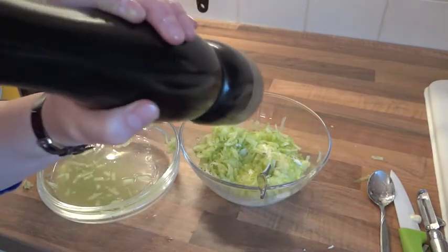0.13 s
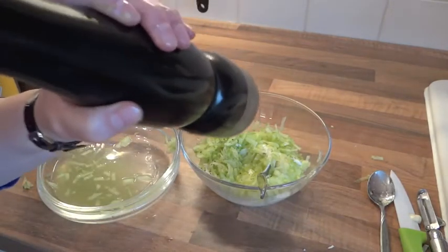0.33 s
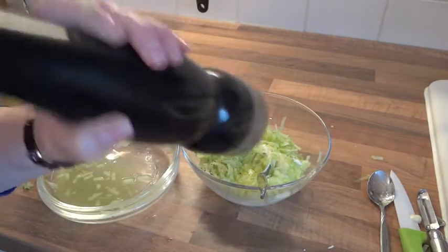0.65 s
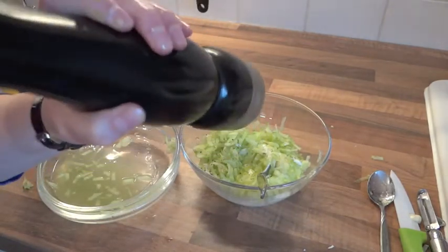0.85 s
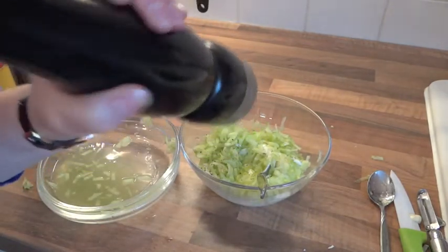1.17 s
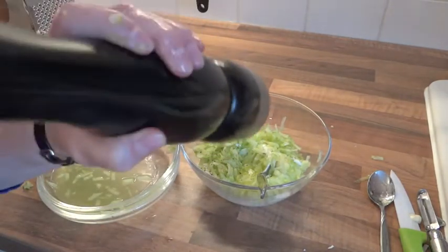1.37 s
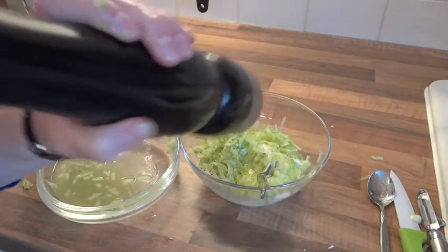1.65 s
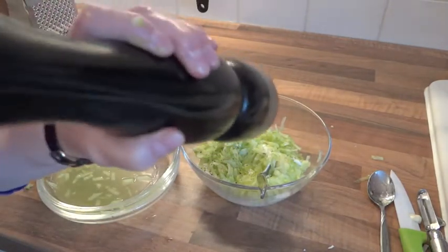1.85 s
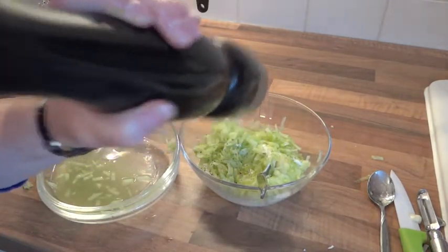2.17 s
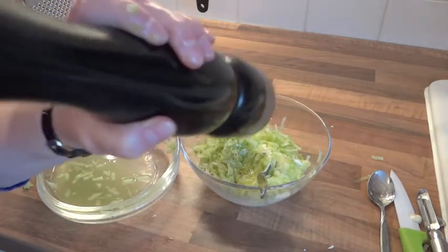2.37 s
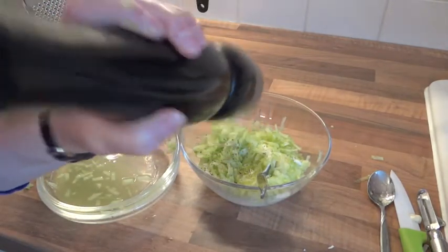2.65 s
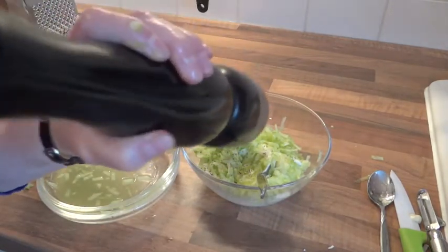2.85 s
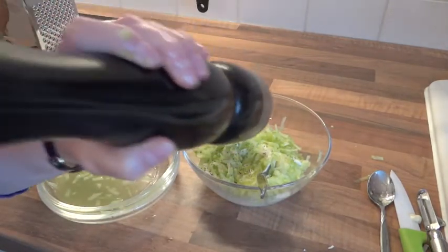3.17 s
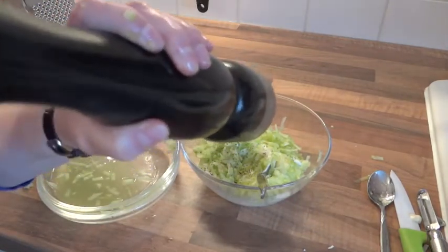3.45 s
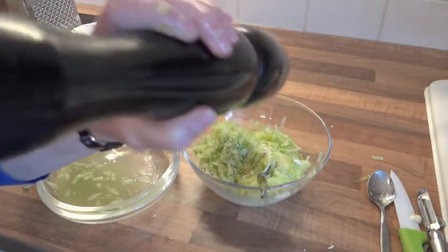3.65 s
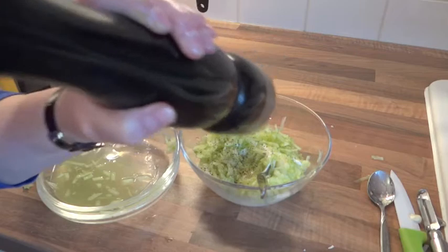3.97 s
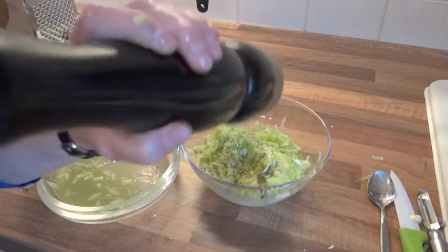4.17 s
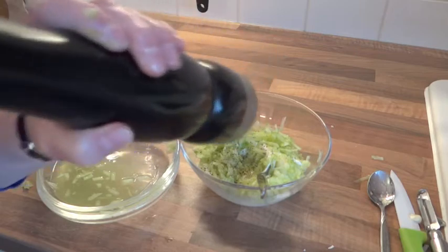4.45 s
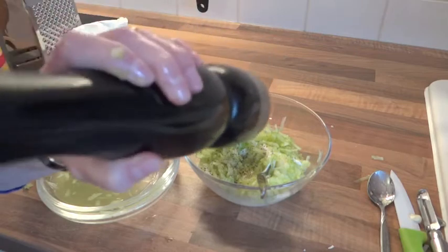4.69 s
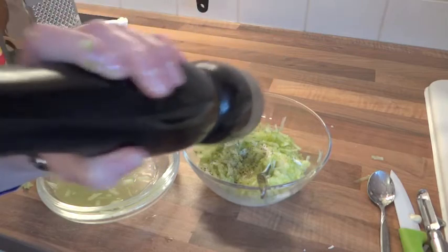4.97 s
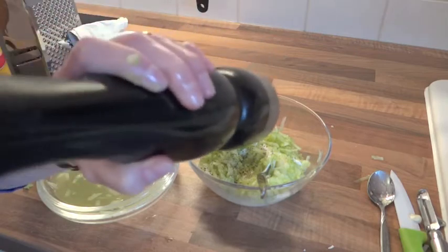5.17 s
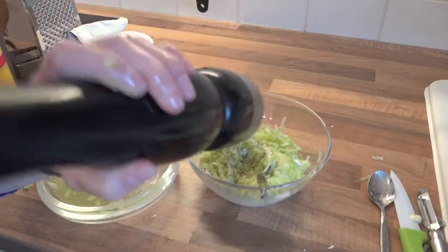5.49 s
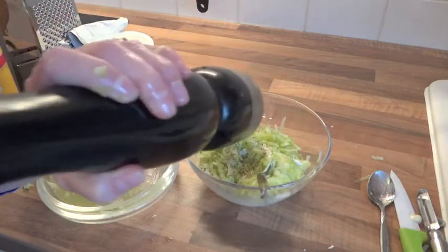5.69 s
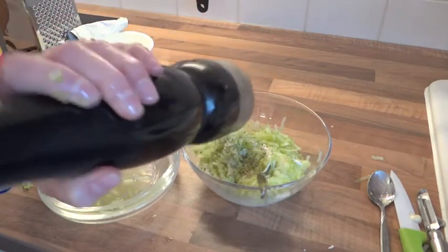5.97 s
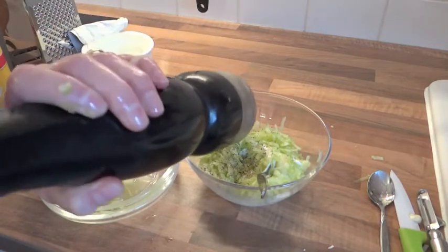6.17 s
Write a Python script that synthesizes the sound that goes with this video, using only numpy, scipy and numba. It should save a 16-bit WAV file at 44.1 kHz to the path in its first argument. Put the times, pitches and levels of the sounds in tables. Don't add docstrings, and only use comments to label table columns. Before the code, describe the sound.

Pepper grinding in a kitchen: short, rough crunches of about a tenth to a fifth of a second, slightly uneven in strength and tone, with small creaking lead-ins as the burr takes up slack. Lone corns pop during and after strokes, fingers tick lightly on the mill, and a loose metal shaft knocks late on. Close phone sound, hard reflective room, quiet household hum.

```python
import sys
import numpy as np
from scipy import signal
from scipy.fft import rfft, irfft
from scipy.io import wavfile
from scipy.ndimage import uniform_filter1d
from numba import njit

SR = 44100
rng = np.random.default_rng(int(sys.argv[2]) if len(sys.argv) > 2 else 0)


def magnitude_from_level(level_db):
    exponent = np.asarray(level_db, float) / 20
    return 10 ** exponent


def wrap_up_sound(samples):
    columns = np.atleast_2d(samples).T
    tamed = np.clip(columns, -1, 1)
    steps = np.round(tamed * 32767).astype(np.int16)
    wavfile.write(sys.argv[1], SR, steps)


N = 279153

# pitch_hz, level_db (per Hz)
HUM = [(15, -53.5), (25, -15), (60, -5.5), (220, -3), (296, 6.5), (456, -12.5), (668, -11.5), (1430, -20.5),
       (2200, -23), (3500, -25), (6000, -28), (7500, -27.5), (11000, -31), (14300, -76), (22000, -120)]
# pitch_hz, side_minus_mid_db
HUM_SIDE = [(60, -15.5), (200, -13), (600, 1.5), (2000, 5), (6000, -4), (10000, -7)]
HUM_DB, WHINE_HZ, WHINE_DB = -57, 7420, -80

# start_s, rise_s, hold_s, fall_s, peak_db
STROKES = [(0.0, .003, 0.0089, 0.045, -13), (0.387, 0.027, 0.0055, 0.013, -21),
           (0.434, 0.011, 0.014, .07, -31), (1.062, 0.03, 0.034, 0.097, -21),
           (1.621, 0.012, 0.039, 0.096, -17), (2.082, 0.056, 0.0071, 0.081, -15),
           (2.546, 0.025, 0.067, 0.049, -16), (3.001, 0.046, 0.058, 0.048, -16.5),
           (3.481, 0.07, 0.013, 0.069, -15.5), (3.97, 0.059, 0.05, 0.072, -14),
           (4.454, 0.042, 0.021, 0.097, -13), (4.919, 0.023, 0.05, .065, -18),
           (5.39, 0.06, 0.027, 0.09, -16), (5.921, .045, 0.033, .06, -19.5)]
# bite_below_peak_db, stop_below_peak_db, thump_db, brightness_db, extra_grit_db
CRUSHES = [(3, 18.5, -7, 0.5, 1.5), (22, 20, -7.5, 0, 1.5), (3, 8.5, -8, 7.5, 9.5), (6, 17.5, -6.5, 0.5, 5),
           (6, 14.5, -11, -1, 2), (19, 20, -9, -2, 1), (4.07, 13.5, -18, 1.5, -2),
           (17, 13.5, -8.5, 1.5, 0.5), (17, 21, -8.5, -2.5, 2), (19.5, 12, -15.5, -2, -1.5),
           (6, 20.5, -16, -1.5, 0.5), (6, 12.5, -14.5, 5.5, -2), (10.1, 17, -14.5, 2, 0.5),
           (4, 8.5, -9, 4.5, -1)]
# body_hz, burr_hz
GRIPS = [(1420, 2800), (1360, 4200), (1326, 2800), (1313, 3540), (1346, 3620), (1413, 3350), (1630, 3470),
         (1464, 3550), (1293, 4100), (1510, 3560), (1296, 3670), (1387, 3900), (1464, 3000), (1346, 3700)]
# start_s, length_s, creep_db, bite_db
SLACKS = [(0.347, .039, -37.5, -27), (1.002, 0.049, -51, -42), (1.569, 0.069, -43, -29),
          (2.069, 0.026, -34.5, -30), (2.48, 0.069, -47, -24), (2.942, 0.055, -46, -39),
          (3.418, 0.07, -54, -37), (3.927, 0.05, -39.5, -29.5), (4.417, 0.035, -38, -23),
          (4.882, 0.038, -36.5, -24.5), (5.355, 0.03, -38, -35), (5.862, 0.052, -47.5, -15)]
# start_s, peak_db, brightness_db, pitch_hz, thump_db
SNAPS = [(.1682, -7, -0.5, 3390, -38), (.5806, -15.5, 0.5, 3510, -1.5), (.6322, -15, 2, 3470, -11),
         (.7138, -21.5, -22, 3350, -22), (1.1859, -15, 6, 5100, 5.5), (1.8537, -16.5, -2.5, 3390, -13.5),
         (2.3124, -25, 5.5, 2720, -4), (2.7866, -23.5, 6.5, 3780, 0), (3.2397, -15.5, 0, 3410, -10),
         (3.724, -16, -5.5, 2540, -12.5), (4.6784, -23, 5.5, 4280, -31), (4.779, -20.5, 7, 4050, -6.5),
         (5.6256, -14, 7, 3780, -13), (5.634, -16.5, 0, 2920, -14)]
# start_s, peak_db, brightness_db, pitch_hz
BITES = [(0.4312, -22, 17, 5630), (1.064, -6.5, 2, 4780), (1.6703, -9.5, -1, 2880), (2.5493, -13, -2, 3660),
         (3.0335, -6, -3, 5100), (3.4984, -18, 3, 3530), (3.5384, -5, 2.5, 3395), (4.597, -18, -8, 3560),
         (.407, -10, -5, 3410), (2.141, -13, -2, 3370), (4.4536, -2, -2.5, 3650), (4.9263, -10.5, 3, 4900),
         (5.4008, -2.5, -49, 3610), (5.9004, -17, 7.5, 4370), (5.926, -10, -1, 4530)]
# start_s, peak_db, brightness_db, pitch_hz
TICKS = [(0.344, -28, 1.5, 3280), (.56, -25, -4, 2070), (1.002, -33.5, 7, 2460), (1.526, -63, 12, 3710),
         (2.06, -24.5, -0.5, 2430), (2.475, -32, 1, 2980), (2.9479, -30, 4, 5000), (3.421, -31, -3.5, 3300),
         (3.4507, -26.5, -4, 2920), (3.937, -30.5, -2, 3460), (4.35, -50, 9, 5300),
         (4.4133, -30, -1.5, 3260), (5.3587, -36, -12, 3380), (5.794, -26, 0.5, 2620),
         (5.8686, -23, -4, 2560)]
EDGES_HZ = (1000, 2300, 6000)
# pitch_hz, level_db (per Hz)
CRACK = [(40, -45), (100, -37.5), (200, -18), (400, -16), (700, -8.5), (1100, -17.5), (1400, 1.5),
         (2500, -12), (3500, -4), (5000, -14), (7700, -12), (11000, -28), (14000, -88.5), (22000, -100)]
# pitch_hz, width_hz, level_db
RINGS = [(1364, 155, -1.5), (1970, 196, -7), (2540, 43, -6.5), (2907, 97, -14), (3390, 100, -4.5),
         (4392, 55, -7.5), (4690, 65, -8), (4850, 140, -3.5), (5536, 84, -4), (6110, 55, -8.5),
         (7100, 90, -31), (7800, 150, -21), (8895, 92, -8.5), (9840, 170, -17.5)]
BURR_DB, GRIT_DB, GRIT_PER_BURR = -2, -5.5, 1.36
DULLING_DB, FALL_BEND, SLACK_BEND = -1.5, 0.6, 2.7
SLACK_BRIGHT_DB, SLACK_THUMP_DB = -1.5, -4.5
SNAP_BURR_DB, SNAP_GRIT_DB, BITE_THUMP_DB, TICK_THUMP_DB = -2, -10, -33, -18.5
SNAP_MS, BITE_MS, TICK_MS = (1.96, 4.46), (0.93, 3.7), (0.6, 3.96)  # rise_ms, fade_ms

# pitch_hz, t60_s
WALLS = [(150, 0.53), (500, 0.37), (1400, 0.44), (3700, 0.42), (9700, 0.34)]
# pitch_hz, side_minus_mid_db
WALLS_SIDE = [(150, -12.5), (600, -10), (2000, -10.5), (6000, -9), (10000, -7.5)]
# pitch_hz, level_db, t60_s
SHAFT = [(3470, -9, 0.3), (3910, -13, 0.2), (4105, -7, 0.16), (4720, -10, 0.2), (5440, -13, 0.22),
         (7000, -15, 0.2), (7590, -18, 0.25)]
# start_s, level_db
SHAFT_KNOCKS = [
    (4.682, -46),
    (4.779, -27),
]
TOP_HZ = 10970


def on_log_hz(table, hz):
    points, values = np.transpose(table)
    return np.interp(np.log(hz + 1), np.log(points), values)


def unit(x):
    return x / np.sqrt(np.mean(x ** 2))


def walk(rate):
    k = int(SR / rate)
    held = np.repeat(rng.standard_normal(N // k + 1), k)
    return unit(uniform_filter1d(held, k)[:N])


@njit
def ring(x, hz, width):
    y, z, p, r = np.empty(len(x)), 0j, 0j, np.exp(-np.pi * width / SR)
    for i in range(len(x)):
        if i % 32 == 0:
            p = r * np.exp(2j * np.pi * hz[i] / SR)
        z = z * p + x[i] + 1e-18
        y[i] = z.imag
    return y * np.sqrt(2 * (1 - r * r))


def hum():
    hz = np.fft.rfftfreq(N, 1 / SR)
    noise = rfft(rng.standard_normal((2, N))) * magnitude_from_level(on_log_hz(HUM, hz))
    noise[1] *= magnitude_from_level(on_log_hz(HUM_SIDE, hz))
    mid, side = irfft(noise, N)
    swell = magnitude_from_level(HUM_DB + 2.0 * walk(6.6))
    return swell * np.array([mid + side, mid - side]) / np.std(mid)


def whine():
    line = ring(rng.standard_normal(N), np.full(N, 1. * WHINE_HZ), 30.)
    return magnitude_from_level(WHINE_DB + 3.0 * walk(3)) * line


def swarm(per_s, spread_db):
    when, sign, size = rng.random((3, N))
    sizes = magnitude_from_level(-spread_db * np.log(size + 0.027))
    return unit((when < per_s / SR) * np.sign(sign - .5) * sizes)


def efforts():
    for (s, *lengths, peak), (bite, stop, thump, bright, grit) in zip(STROKES, CRUSHES):
        up, hold, down = (np.linspace(0, 1, max(int(d * SR), 1)) for d in lengths)
        db = peak - np.r_[bite * (1 - up), 0 * hold, stop * down ** FALL_BEND]
        yield s, db, bright, grit + DULLING_DB * np.r_[0 * up, 0 * hold, down], thump
    for s, length, creep, bite in SLACKS:
        db = creep + (bite - creep) * np.linspace(0, 1, int(length * SR)) ** SLACK_BEND
        yield s, db, SLACK_BRIGHT_DB, 0, SLACK_THUMP_DB


def crushing(cracks, direct_db):
    drive = np.zeros((4, N))
    for s, db, bright, extra_grit, thump in efforts():
        span = slice(int(s * SR), int(s * SR) + len(db))
        onset = np.minimum(np.arange(len(db)) / SR / 0.0013, 1)
        grit = GRIT_DB + GRIT_PER_BURR * bright + extra_grit
        for k, rel in enumerate((thump, 0, BURR_DB + bright, grit)):
            drive[k, span] += magnitude_from_level(db + rel + direct_db) * onset * cracks[span]
    return drive


def lone_corns(snap_db):
    snaps, notes = np.zeros((4, N)), np.zeros(N)
    t = np.arange(2000) / SR
    corns = [(*row, SNAP_MS) for row in SNAPS]
    corns += [(*row, BITE_THUMP_DB, BITE_MS) for row in BITES]
    corns += [(*row, TICK_THUMP_DB, TICK_MS) for row in TICKS]
    for s, body, bright, hz, thump, (rise_ms, fade_ms) in corns:
        splinter = np.sign(rng.standard_normal(2000))
        rise = 1 - np.exp(-t * 1000 / rise_ms)
        fade = np.exp(-t * 1000 / fade_ms)
        span = slice(int(s * SR), int(s * SR) + 2000)
        burr = SNAP_BURR_DB + bright
        grit = SNAP_GRIT_DB + GRIT_PER_BURR * bright
        levels = magnitude_from_level(body + snap_db + np.array([[thump], [0], [burr], [grit]]))
        snaps[:, span] += levels * splinter * rise * fade
        notes[span] += magnitude_from_level(body + burr + snap_db + 4.5) * np.sin(2 * np.pi * hz * t) * rise * fade ** 2
    return snaps, notes


def causal(db):
    cepstrum = irfft(db * np.log(10) / 20)
    cepstrum[1:512] *= 2
    cepstrum[513:] = 0
    return irfft(np.exp(rfft(cepstrum)))


def bare_click(low_hz, high_hz):
    hz = np.arange(513) * SR / 1024
    below = np.log2((low_hz + 1) / (hz + 1))
    above = np.log2((hz + 1) / (high_hz + 1))
    skirt_db = -40 * np.maximum(0, np.maximum(below, above))
    click = causal(np.maximum(on_log_hz(CRACK, hz) + skirt_db, -90))
    return click / np.linalg.norm(click)


def mill():
    cracks = swarm(3000, spread_db=3.5) * magnitude_from_level(1.95 * walk(120))
    drive = crushing(cracks, direct_db=-4)
    snaps, rings = lone_corns(snap_db=-4.5)
    edges = (0, *EDGES_HZ, SR)
    clicks_db, modes_db = (-4.5, -8, -5.5, -1.74), (0, -5, -6, -12.5)
    clicks = np.zeros(N)
    for k in range(4):
        drive[k] *= magnitude_from_level(2.44 * walk(45))
        click = magnitude_from_level(clicks_db[k]) * bare_click(edges[k], edges[k + 1])
        clicks += signal.oaconvolve(drive[k] + magnitude_from_level(2.0) * snaps[k], click)[:N]
        modes = [m for m in RINGS if edges[k] <= m[0] < edges[k + 1]]
        power = sum(magnitude_from_level(db) ** 2 * w for f, w, db in modes)
        scale = magnitude_from_level(modes_db[k]) / np.sqrt(1e-9 + power)
        for f, w, db in modes:
            strike = drive[k] * magnitude_from_level(3.22 * walk(25)) + magnitude_from_level(0.5) * snaps[k]
            strike = strike * rng.standard_normal(N)
            rings += scale * magnitude_from_level(db) * np.sqrt(w) * ring(strike, f * (1 + 0.023 * walk(7)), 1. * w)
    peaks_s = [row[0] + row[1] for row in STROKES]
    for k, (grip_hz, db) in enumerate(zip(np.transpose(GRIPS), (-4.5, -8.5)), start=1):
        strike = (drive[k] + magnitude_from_level(-7.5) * snaps[k]) * rng.standard_normal(N)
        rings += magnitude_from_level(db) * ring(strike, np.interp(np.arange(N) / SR, peaks_s, grip_hz), 120.)
    out = clicks + signal.sosfilt(signal.butter(3, 700, "high", fs=SR, output="sos"), rings)
    return signal.lfilter(*signal.butter(1, 70, "high", fs=SR), out)


def kitchen(x, wet_db, gap_ms, sway_s):
    t = np.arange(SR * 3 // 4) / SR
    hz = np.fft.rfftfreq(len(t), 1 / SR)
    noise = rfft(rng.standard_normal((3, 2, len(t))))
    noise[:, 1] *= magnitude_from_level(on_log_hz(WALLS_SIDE, hz))
    echo = 0
    for k, (_, t60) in enumerate(WALLS):
        share = on_log_hz([(f, j == k) for j, (f, _) in enumerate(WALLS)], hz)
        echo = echo + irfft(noise * share, len(t)) * magnitude_from_level(-60 * t / t60)
    echo = echo * np.clip(t * 1000 / gap_ms - 1, 0, 1)
    echo = echo * magnitude_from_level(wet_db) / np.linalg.norm(echo[0, 0])
    phase = np.arange(N) / SR / sway_s + np.arange(3)[:, None] / 3
    turns = np.sqrt(2 / 3) * np.cos(2 * np.pi * phase)
    mid, side = signal.fftconvolve((x * turns)[:, None], echo, axes=2).sum(axis=0)[:, :N]
    return np.array([mid + side, mid - side])


def shaft():
    t, out = np.arange(8000) / SR, np.zeros(N)
    tone = sum(magnitude_from_level(db - 60 * t / min(t60, .15)) * np.sin(2 * np.pi * hz * t) for hz, db, t60 in SHAFT)
    for s, db in SHAFT_KNOCKS:
        out[int(s * SR):int(s * SR) + 8000] += magnitude_from_level(db) * tone
    return out


def scene():
    dry = mill() + shaft()
    direct = dry * magnitude_from_level(np.array([[.45], [-.45]]))
    return direct + kitchen(dry, wet_db=-0.5, gap_ms=1.34, sway_s=2.609) + hum() + whine()


def low_pass(x):
    return signal.sosfilt(signal.butter(12, 11210, fs=SR, output="sos"), x)


def record(dry):
    rounded = np.tanh(1.668 * dry) / 1.774
    soft = signal.lfilter(*signal.butter(1, 60, "high", fs=SR), rounded)
    cut = signal.sosfilt(signal.ellip(10, .3, 60, TOP_HZ, fs=SR, output="sos"), soft)
    return low_pass(cut)


dry = scene()
out = record(dry)
wrap_up_sound(out)
```